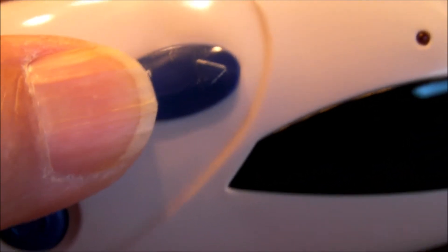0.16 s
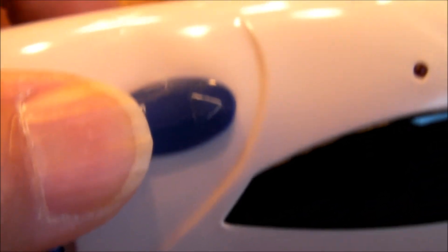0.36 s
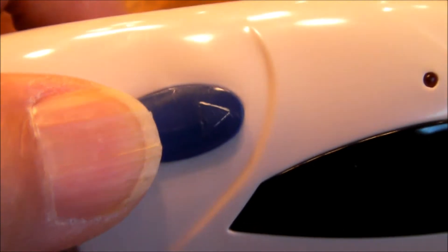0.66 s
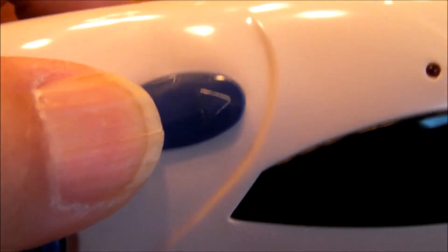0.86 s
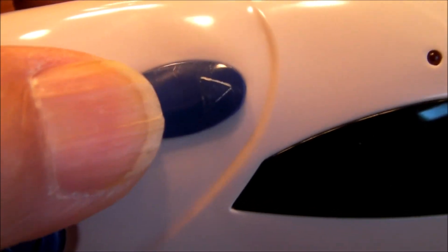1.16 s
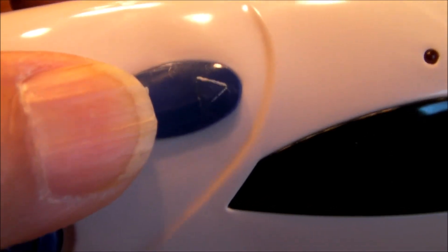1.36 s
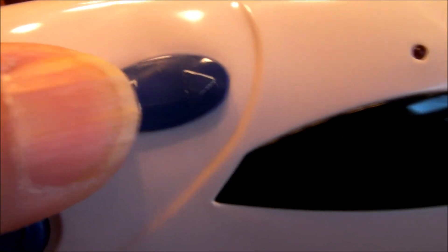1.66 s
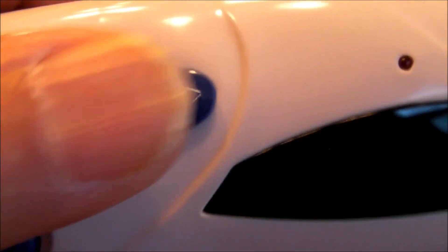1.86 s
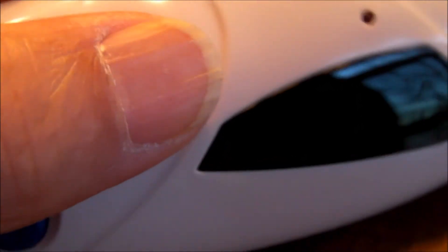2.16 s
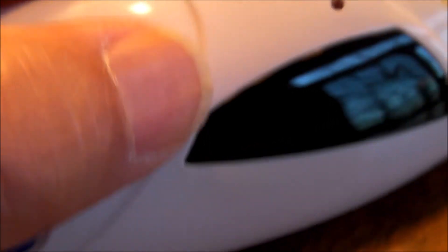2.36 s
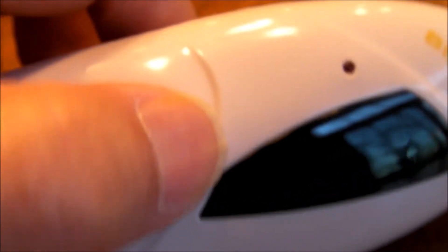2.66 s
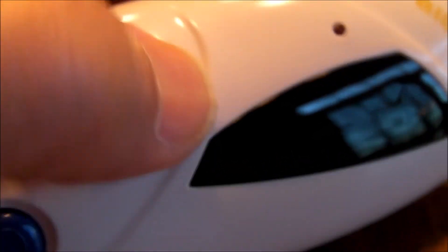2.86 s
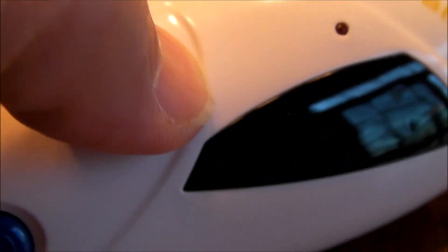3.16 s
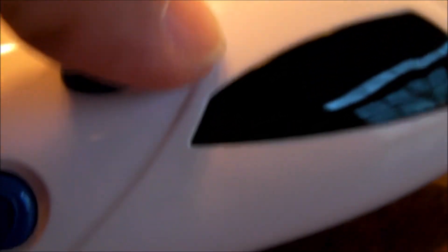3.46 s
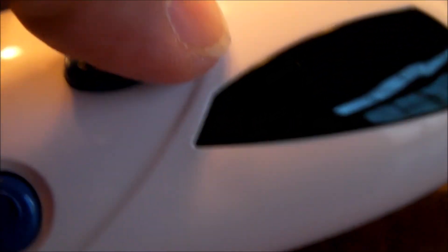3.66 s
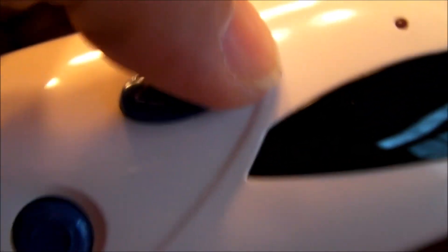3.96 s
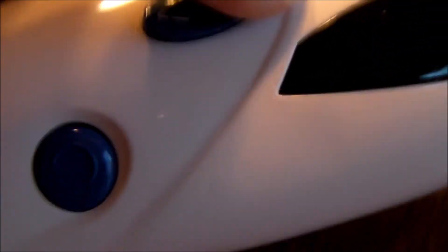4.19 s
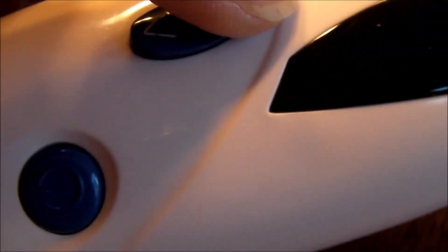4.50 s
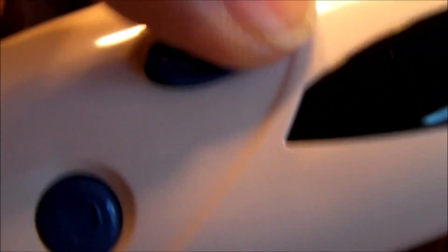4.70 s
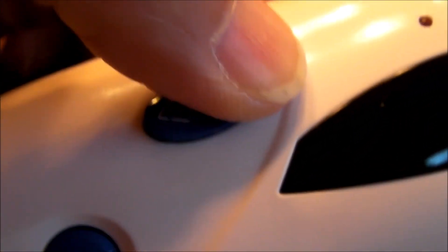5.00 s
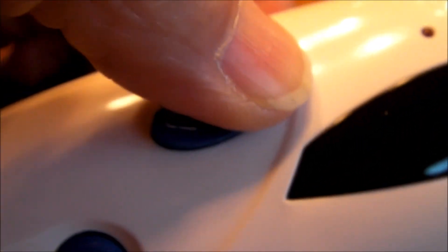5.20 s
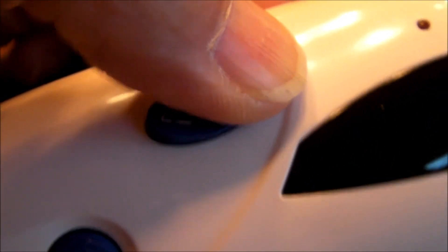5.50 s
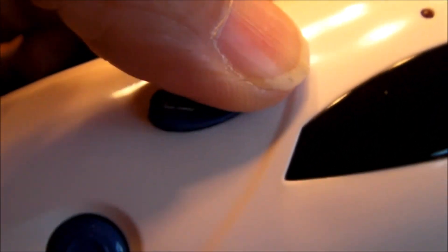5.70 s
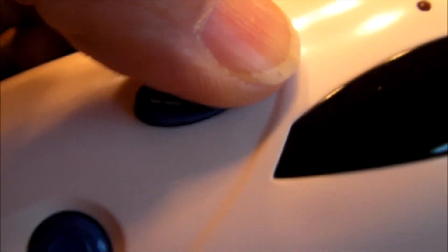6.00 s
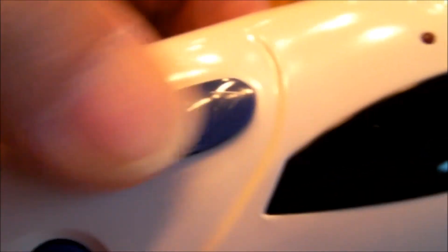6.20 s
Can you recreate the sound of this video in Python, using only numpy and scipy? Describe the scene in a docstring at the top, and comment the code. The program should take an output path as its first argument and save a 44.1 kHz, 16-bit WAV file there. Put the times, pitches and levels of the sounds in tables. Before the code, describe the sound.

In a quiet room with a faint hum, a small plastic button on a handheld controller snaps sharply several times, close to the microphone. Soft handling noise leads to a single hollow thump, then a couple of lighter clicks and the faint hiss of a thumb sliding across the shell. The other end of the button is then pressed and released five times, duller and gradually faster, before the thumb scuffs away.

```python
"""Rocker button, close up

A quiet room, a stereo microphone close to a plastic handheld controller. A thumb works a rocker button
with a small switch under each end: each snaps, chatters for two milliseconds and knocks the hollow
shell, which rings briefly. Between the two runs of clicks the controller takes one dull bump and the
thumb slides across to the other end."""
import sys
import numpy as np
from scipy import signal
from scipy.fft import rfft, irfft
from scipy.io import wavfile
from scipy.ndimage import uniform_filter1d

SR = 44100
rng = np.random.default_rng(int(sys.argv[2]) if len(sys.argv) > 2 else 0)


def dump_mix(stems):
    """Bounce the given channels to the path in sys.argv[1] as a 16-bit WAV at rate SR."""
    frames = np.atleast_2d(stems).T  # one column per channel
    limited = np.clip(frames, -1, 1)  # hard clip at full scale
    pcm = np.round(limited * 32767).astype(np.int16)
    wavfile.write(sys.argv[1], SR, pcm)


N = 279770
TIME = np.arange(N) / SR
LEAD_S = .004  # run-in ahead of each click

# The strokes: "first" is a crisp, sharp snap; "press" is a duller click; "release" is a lighter one.
# Each row: start in seconds, stroke, level in dB, brightness in dB.
ROCKER_CLICKS = [(0.0076, "first", -29, 2.5), (0.7552, "first", -28.5, -1), (0.99, "first", -28, -1),
                 (1.2164, "first", -29, -.5), (1.37, "first", -29, 1.5), (1.519, "first", -29.5, -1),
                 (1.6966, "first", -28, 7.5), (3.1131, "first", -34, 7), (3.3663, "release", -44, 7.5),
                 (3.671, "release", -64, 12), (4.6486, "press", -30.5, -9), (4.8971, "release", -39.5, 4),
                 (5.1328, "press", -31, -5), (5.3279, "release", -43, -1.5), (5.4934, "press", -30, -2),
                 (5.604, "release", -41, -1.5), (5.7239, "press", -30, 7), (5.8808, "release", -46.5, -5),
                 (5.9872, "press", -30.5, 11), (6.1269, "release", -36, 3.5)]
# Edges in Hz of a click's five bands: body, knock, clack, snap, fizz.
CLICK_BANDS_HZ = [250, 700, 1500, 4000, 9000, 16000]
BAND_CENTRES_HZ = np.sqrt(np.multiply(CLICK_BANDS_HZ[1:], CLICK_BANDS_HZ[:-1]))
# For each stroke, its colour: relative levels of those five bands in dB.
STROKE_COLOUR_DB = {"first": (-10, -.5, -5.5, -4.5, -8), "press": (-7.5, -.5, -5.5, -11, -11),
                    "release": (-2.5, 0, -4, -2, -4.5), "bump": (3, -1, 1, 0, -8)}
# For each stroke, the corner in Hz above which brightness lifts or lowers it.
BRIGHT_CORNER_HZ = {"first": 2050, "press": 7300, "release": 2680, "bump": 3000}
# For each stroke, the pitch of the shell's knock in Hz.
KNOCK_PITCH_HZ = {"first": 1087, "press": 999, "release": 830, "bump": 546}
# Resonances of switch and cap. Each row: centre in Hz, width in Hz, crisp and dull voice gains in dB.
SWITCH_RESONANCES = [(1630, 860, -11, -2.5), (2350, 220, -22, 2), (2520, 420, 9, -8), (2930, 420, -30, 8),
                     (3640, 3250, 8.5, 2), (4700, 1200, -33, 1), (5360, 440, 4, -1), (7700, 2500, 5, -2.5),
                     (9830, 3800, 8.5, -12), (12060, 2100, 0, 8), (13800, 2100, -10, -3)]
# The hollow shell. Each row: pitch in Hz, t60 in seconds, crisp and dull voice gains in dB.
SHELL_MODES = [(398, 0.051, -60, -13.5), (473, 0.028, -6.5, -12), (586, 0.13, -12, -23),
               (680, 0.026, -3.5, -14), (884, 0.081, -16.5, -30), (979, 0.035, -12, -12),
               (1087, 0.022, -8, -9), (1258, 0.024, -11, -17), (1510, 0.018, -15, -23),
               (2355, 0.022, -32, -13.5), (2694, 0.014, -13.5, -42)]
# The bump and its rebounds. Each row: start in seconds, level in dB.
BUMP_BLOWS = [(2.324, -24.5), (2.3469, -30), (2.3546, -39.5)]
# Modes rung by the bump: the controller's own, plus the long, beating pair near 175 and 187 Hz, which belongs
# to the room. Each row: pitch in Hz, gain in dB, t60 in seconds.
BUMP_MODES = [(126.7, -18.5, 0.46), (166, -12, 0.24), (174.8, -20, 0.69), (187, -21, 0.64),
              (256, -0.5, 0.055), (318, -7, 0.089), (374, -0.5, 0.094), (415, 1, 0.14), (499, 0, 0.087),
              (579, 3.5, 0.081), (982.4, -9.5, 0.27), (1186, -22, 0.25), (1600, -9, 0.083)]
# Fingers landing on the shell. Each row: start in seconds, relative level in dB, centre in Hz.
FINGER_TAPS = [(0.18, -55, 1070), (0.398, -48.5, 1190), (0.419, -46.5, 593), (1.98, -33.5, 675),
               (3.176, -47, 1145), (3.246, -47.5, 1060), (3.282, -48, 450), (4.027, -52, 694),
               (4.581, -52, 1140), (6.307, -45, 596)]
# Skin catching on plastic. Each row: start and length in seconds, centre and width in Hz, level in dB.
SKIN_SCUFFS = [(1.731, 0.051, 4170, 5000, -54), (1.961, 0.12, 5600, 2600, -52.5),
               (1.976, 0.11, 1150, 910, -59.5), (3.139, 0.12, 870, 1190, -59.5),
               (3.284, 0.01, 5000, 9000, -55), (3.444, .04, 4500, 5000, -58.5),
               (3.825, 0.06, 2570, 1640, -57.5), (6.147, 0.05, 3680, 2250, -42),
               (6.145, 0.23, 4200, 1690, -56.5)]
# The thumb's travel. Each row: start and length in seconds, relative rub and hiss levels in dB.
THUMB_SLIDES = [(1.724, 0.46, -64.5, -60.5), (2.147, 0.38, -60.5, -60.5), (2.7, 0.5, -70, -63.5),
                (3.014, 0.61, -66.5, -61.5), (3.594, 0.87, -61.5, -61.5), (6.065, 0.27, -63.5, -58)]
# Spectra of the thumb's rub and hiss and of the room's air. Each row: frequency in Hz, density in dB.
RUB_SPECTRUM = [(400, -33), (900, 0.5), (1800, 0.5), (2800, 0), (4200, -4), (7000, -4), (16000, -14)]
HISS_SPECTRUM = [(1500, -21), (3000, -8), (4500, 1.5), (7000, -5.5), (11000, -1.5), (15500, -4)]
AIR_SPECTRUM = [(20, -24), (45, -13.5), (80, -7), (125, -0.5), (175, -18.5), (240, -9), (420, -14),
                (620, -12), (1000, -14.5), (1800, -21.5), (4500, -21.5), (15000, -25.5)]
# Hum in the room tone. Each row: centre in Hz, width in Hz, level in dB.
HUM_BANDS = [(179, 38, -68.5), (300.4, 7.9, -81.5), (407, 144, -68), (3024, 390, -76)]
# The room's reverberation. Each row: frequency in Hz, level in dB, t60 in seconds.
ROOM_DECAY = [(150, -7.5, 0.55), (450, -6.5, 0.45), (890, -13.5, 0.38), (1800, -11.5, 0.23),
              (3960, -9.5, 0.125), (9000, -5.5, 0.115), (15100, -11.5, 0.115)]
# Noise at the two microphone ports. Each row: frequency in Hz, left-right correlation.
PORT_LIKENESS = [(25, 0.25), (60, 0.77), (150, 0.83), (1000, 0.75), (2500, 0.56), (5000, 0.21),
                 (8000, 0.073), (15000, 0.35)]
# Phase between the ports. Each row: frequency in Hz, left lead in radians (negative is later).
PORT_LEAD = [(100, -.05), (1500, -.22), (3000, -.3), (5000, -.9), (7750, -1.3), (11000, -1.75),
             (16000, -2.5)]
# Balance of the ports. Each row: frequency in Hz, left over right in dB.
PORT_BALANCE = [(60, -0.28), (600, -1.5), (2000, -0.81), (5000, -0.21), (10000, -0.15), (14000, -1.0)]


def rocker():
    """Close to the microphone, the thumb clicks one end of the rocker button, then the other end."""
    out = np.zeros((2, N))
    for start, stroke, level_db, bright_db in ROCKER_CLICKS:
        add(out, start - LEAD_S, click(stroke, level_db, bright_db))
    return out


def click(stroke, level_db, bright_db, chatter_db=-1, size=8192):
    """One stroke: the switch chatters and knocks the shell, which rings on."""
    t = np.arange(size) / SR
    voice = int(stroke in ("press", "release"))  # 0 is the crisp voice, 1 the dull one
    chatter = switch_chatter(t, voice)
    sound = gain_of(chatter_db) * 2 * chatter / abs(chatter).max()
    sound = sound + shell_knock(t, KNOCK_PITCH_HZ[stroke], voice) + shell_ring(t, voice)
    treble = 1 / (1 + (BRIGHT_CORNER_HZ[stroke] / BAND_CENTRES_HZ) ** 2)
    bands_db = level_db + np.array(STROKE_COLOUR_DB[stroke]) + bright_db * treble
    return tilted(np.roll(sound, round(LEAD_S * SR), 1), bands_db)


def switch_chatter(t, voice, length_s=.0022, fall_s=.001, sag_s=.005, buzz_s=.01, snap_s=.0007):
    """The spring snaps over and rattles until the button bottoms out; switch and cap colour it."""
    hz = np.fft.rfftfreq(len(t), 1 / SR)
    snap = gain_of(9.5) * np.exp(-2j * np.pi * hz * snap_s)  # one impulse at snap_s
    envelope = np.exp(-t / sag_s - np.maximum(t - length_s, 0) / fall_s)
    envelope += gain_of(-20) * np.exp(-t / buzz_s)
    rattle = noise(np.ones_like, size=len(t))
    rattle = unit_rms(rattle + rattle.mean(0))  # drawn halfway to the centre
    force = snap + rfft(rattle * envelope)
    colour = sum(gain_of(db[voice]) * resonance(hz, f, width) for f, width, *db in SWITCH_RESONANCES)
    return irfft(force * colour, len(t))


def shell_knock(t, pitch_hz, voice, crest_s=.0018):
    """The shell is pushed and springs back: a few cycles around a crest, fewer in the dull voice."""
    spread_s = .0007 if voice else .001
    swell = np.exp(-((t - crest_s) / spread_s) ** 2 / 2)
    return swell * np.cos(2 * np.pi * pitch_hz * (t - crest_s))


def shell_ring(t, voice, delay_s=0.00113, rise_s=0.00039):
    """The shell's modes ring on; the grip shifts and damps them a little differently each time."""
    age = np.maximum(t - delay_s, 0)
    shift, damping = 1 + np.array([[.005], [.15]]) * rng.uniform(-1, 1, (2, len(SHELL_MODES)))
    modes = sum(gain_of(db[voice] - 60 * age * damping[k] / t60) * np.sin(2 * np.pi * f * shift[k] * age)
                for k, (f, t60, *db) in enumerate(SHELL_MODES))
    return modes * (1 - np.exp(-age / rise_s))


def tilted(sound, bands_db, span_s=.011):
    """A click's weight and brightness: a smooth tilt draws each band toward its level over span_s."""
    size = sound.shape[1]
    hz, spectrum = np.fft.rfftfreq(size, 1 / SR), rfft(sound)
    for _ in range(2):
        power = (abs(spectrum) ** 2).mean(0) * 2 / (size * span_s * SR)
        own_db = 10 * np.log10(np.histogram(hz, CLICK_BANDS_HZ, weights=power)[0] + 1e-20)
        spectrum *= gain_of(curve(np.c_[BAND_CENTRES_HZ, bands_db - own_db], hz))
    return irfft(spectrum, size)


def bump(rise_s=0.00063):
    """The whole controller is knocked with a hard edge and rebounds, ringing low; the room answers with a slow,
    beating ring near 180 Hz."""
    out, t = np.zeros((2, N)), np.arange(SR) / SR
    add(out, BUMP_BLOWS[0][0] - LEAD_S, click("bump", level_db=-33, bright_db=0))
    modes = sum(gain_of(db - 60 * t / t60) * np.sin(2 * np.pi * f * t) for f, db, t60 in BUMP_MODES)
    for start, db in BUMP_BLOWS:
        add(out, start, gain_of(db) * modes * (1 - np.exp(-t / rise_s)))
    return out


def fingers(tap_db=-6, tap_decay_s=0.0074, size=4096):
    """Handling noise: soft taps and short scuffs of skin on the shell."""
    out, t = np.zeros((2, N)), np.arange(size) / SR
    for start, db, f in FINGER_TAPS:
        tap = noise(lambda hz: resonance(hz, f, width_hz=0.74 * f), size)
        add(out, start, gain_of(db + tap_db) * np.exp(-t / tap_decay_s) * tap)
    for start, length, f, width, db in SKIN_SCUFFS:
        swell = np.hanning(round(length * SR))
        scuff = noise(lambda hz: resonance(hz, f, width) ** 2, len(swell))
        add(out, start, gain_of(db) * swell * scuff)
    return out


def thumb_slide(rub_lift_db=2, grain_db=1.0, drag_db=2.0, skew=1.51):
    """Skin rubs over smooth plastic, grainy and dragging, swelling and fading with the thumb's speed."""
    rub_level, hiss_level = np.zeros((2, N))
    for start, length, rub_db, hiss_db in THUMB_SLIDES:
        progress = np.clip((TIME - start) / length, 0, 1)
        speed = abs(np.sin(np.pi * progress ** skew)) ** 0.5  # gathers slowly, stops sooner
        rub_level += speed * gain_of(rub_db)
        hiss_level += speed * gain_of(hiss_db)
    grain = unit_rms(uniform_filter1d(rng.standard_normal(N), size=300))
    drag = unit_rms(uniform_filter1d(rng.standard_normal(N), size=2000))
    rough_db = grain_db * grain + drag_db * drag
    rub = rub_level * noise(lambda hz: gain_of(curve(RUB_SPECTRUM, hz)))
    hiss = hiss_level * noise(lambda hz: gain_of(curve(HISS_SPECTRUM, hz)))
    return rub * gain_of(rub_lift_db + rough_db) + hiss * gain_of(rough_db / 2)


def room_reflections(sound, gap_s=.002, early_db=2, early_s=.012, size=22050):
    """Dense early reflections off near surfaces, then a short tail that dies faster in the treble."""
    hz, t, frames = signal.stft(noise(np.ones_like, size), SR, nperseg=256)
    table = np.array(ROOM_DECAY)
    level_db = curve(table[:, :2], hz)[:, None]
    t60 = curve(table[:, ::2], hz)[:, None]
    unit_energy = np.sqrt(2 * np.log(1000) / (t60 * SR))
    decay = unit_energy * gain_of(level_db - 60 * t / t60)
    tail = signal.istft(frames * decay, SR, nperseg=256)[1][:, :size]
    age = np.arange(size) / SR
    onset = np.clip(age / gap_s - 1, 0, 1) * gain_of(early_db * np.exp(-age / early_s))
    return signal.fftconvolve(sound, tail * onset, axes=1)[:, :N]


def room_tone(air_db=-62):
    """The quiet room behind it all: a low rush of air, faint hiss and a few humming bands."""
    hum = sum(gain_of(db) * noise(lambda hz: resonance(hz, f, width) ** 2) for f, width, db in HUM_BANDS)
    air = noise(lambda hz: gain_of(curve(AIR_SPECTRUM, hz)))
    return hum + gain_of(air_db) * air


def noise(shape, size=N):
    """Noise with the spectrum shape(Hz), partly alike at the two ports, rms 1."""
    hz = np.fft.rfftfreq(size, 1 / SR)
    left, other = rfft(rng.standard_normal((2, size)))
    likeness = np.clip(curve(PORT_LIKENESS, hz), 0, 1)
    right = likeness * left + np.sqrt(1 - likeness ** 2) * other
    return unit_rms(irfft(np.array([left, right]) * shape(hz), size))


def resonance(hz, centre_hz, width_hz):
    """Complex response of one resonance, gain 1 at its centre."""
    return 1j * hz * width_hz / (centre_hz ** 2 - hz ** 2 + 1j * hz * width_hz)


def curve(points, hz):
    """Reads rows of (Hz, value) on a log-frequency axis."""
    f, value = np.transpose(points)
    return np.interp(np.log(hz + 1), np.log(f + 1), value)


def gain_of(db):
    """Decibels to amplitude."""
    return 10 ** (np.asarray(db) / 20)


def unit_rms(x):
    """Scales to rms 1."""
    return x / np.sqrt(np.mean(x ** 2) + 1e-20)


def add(mix, start_s, sound):
    """Mixes a sound in at start_s."""
    part = mix[:, max(round(start_s * SR), 0):][:, :sound.shape[-1]]
    part += sound[..., :part.shape[1]]


def scene(low_cut_hz=115):
    """The controller up close, the room behind; so small a shell radiates no deep bass."""
    near = rocker() + bump() + fingers()
    near = signal.sosfilt(signal.butter(4, low_cut_hz, "high", fs=SR, output="sos"), near)
    return near + room_reflections(near) + thumb_slide() + room_tone()


def record(dry, top_hz=15950):
    """Two closely spaced microphone ports, the left a little later and fainter; then the band limit."""
    hz = np.fft.rfftfreq(N, 1 / SR)
    half_balance = gain_of(curve(PORT_BALANCE, hz) / 2)
    left_phase = np.exp(1j * curve(PORT_LEAD, hz))
    left, right = rfft(dry)
    ports = irfft(np.array([left * half_balance * left_phase, right / half_balance]), N)
    low_pass = signal.firwin(255, top_hz, window=("kaiser", 9), fs=SR)
    return signal.oaconvolve(ports, low_pass[None], "same")


dry = scene()
out = record(dry)
dump_mix(out)
```